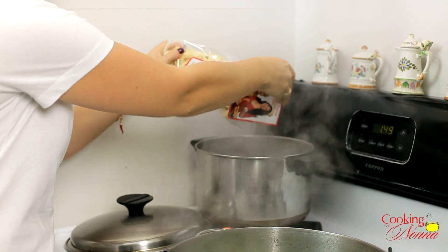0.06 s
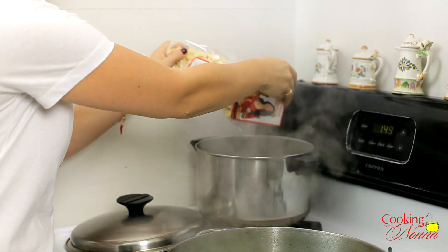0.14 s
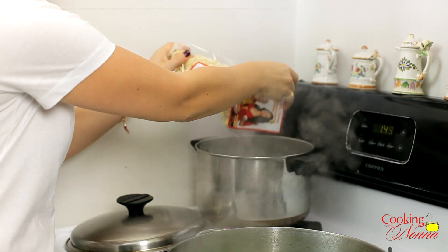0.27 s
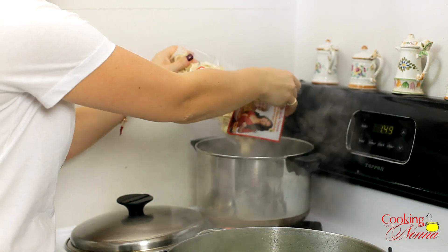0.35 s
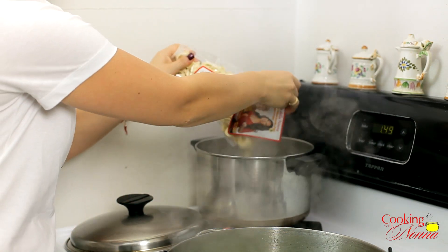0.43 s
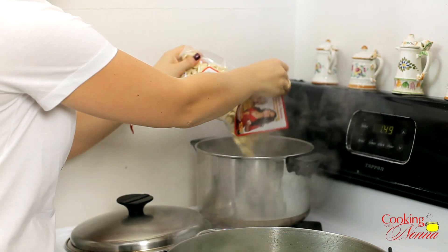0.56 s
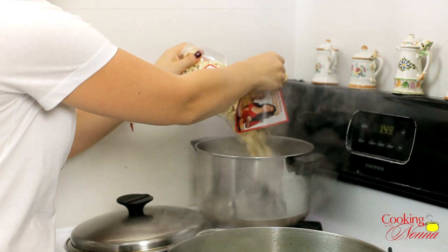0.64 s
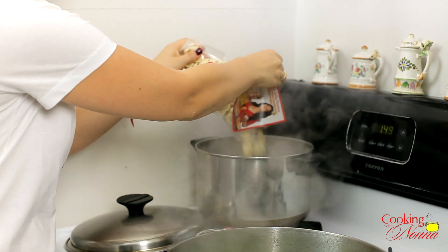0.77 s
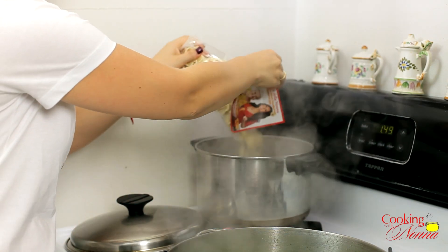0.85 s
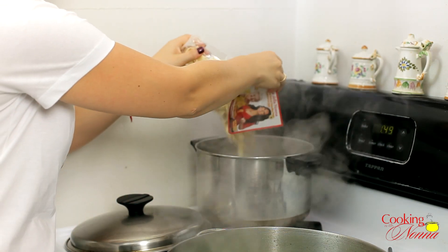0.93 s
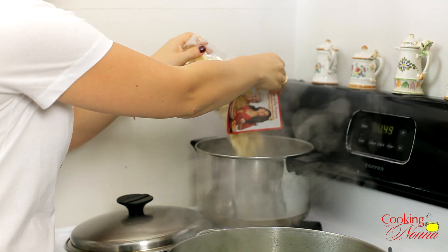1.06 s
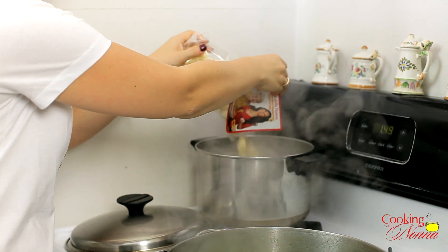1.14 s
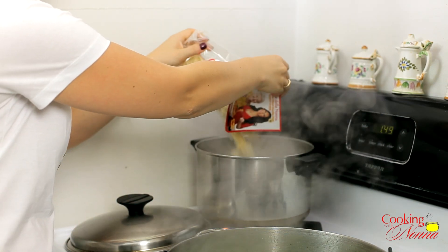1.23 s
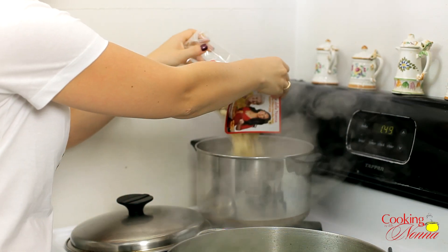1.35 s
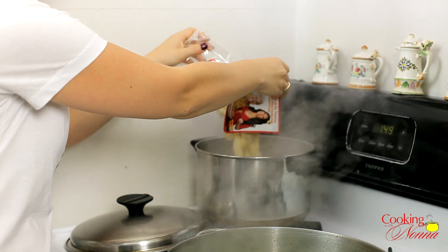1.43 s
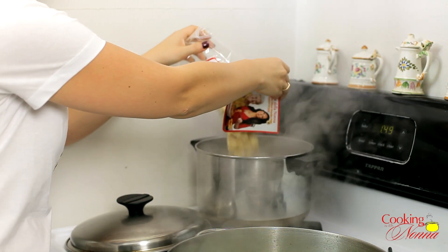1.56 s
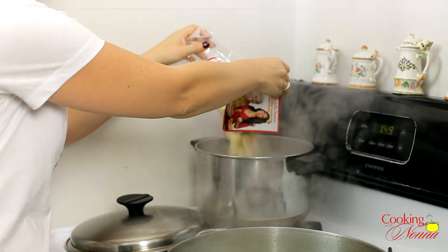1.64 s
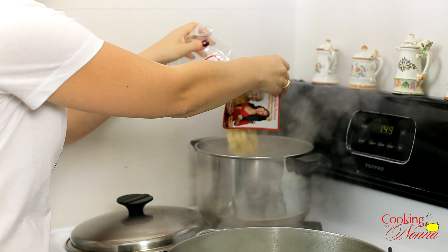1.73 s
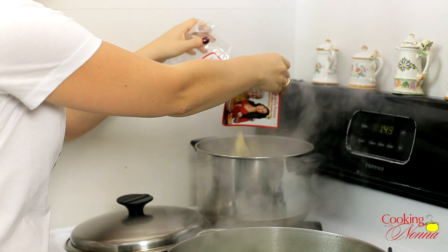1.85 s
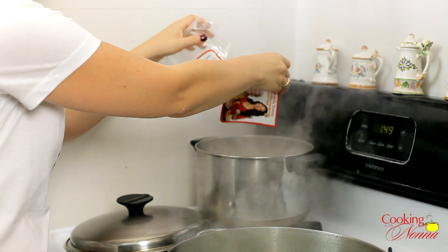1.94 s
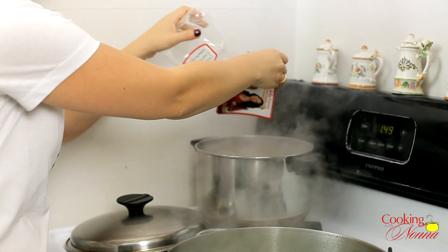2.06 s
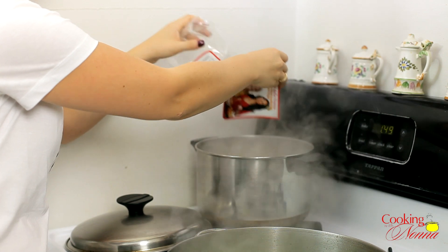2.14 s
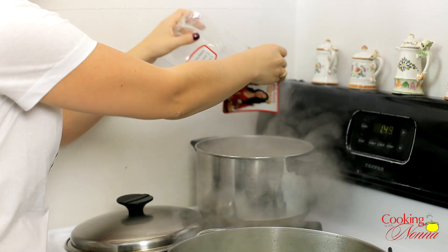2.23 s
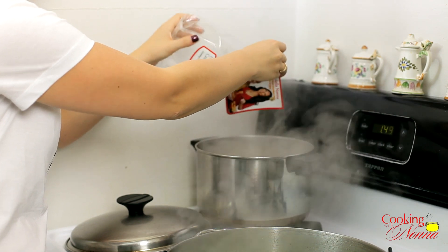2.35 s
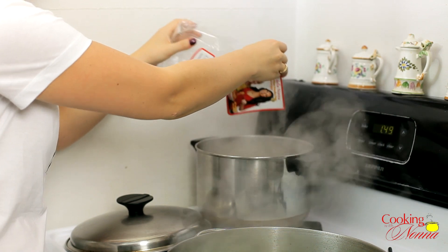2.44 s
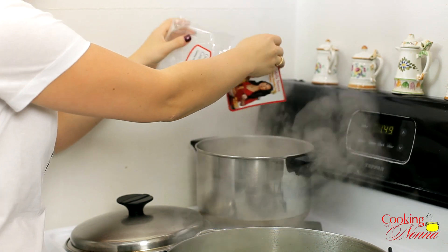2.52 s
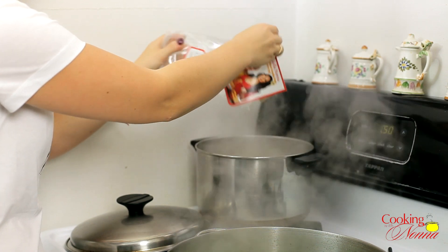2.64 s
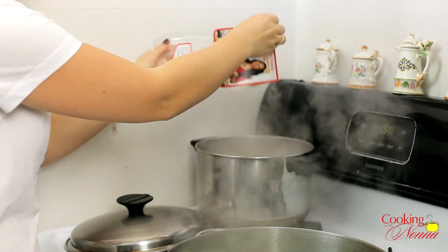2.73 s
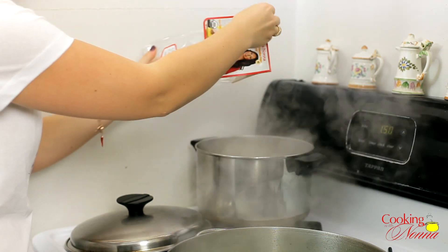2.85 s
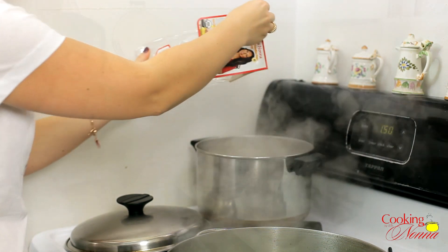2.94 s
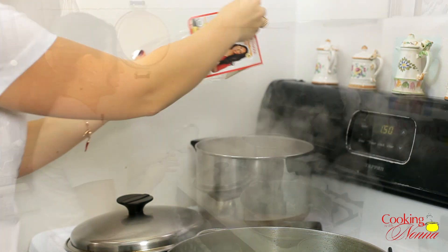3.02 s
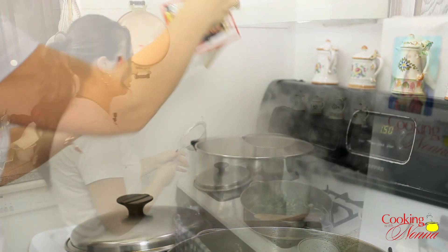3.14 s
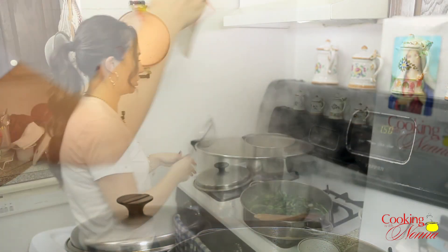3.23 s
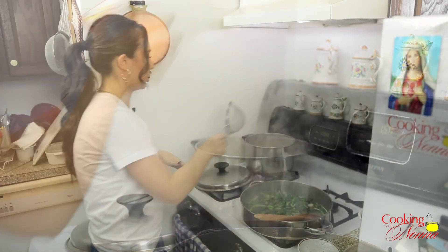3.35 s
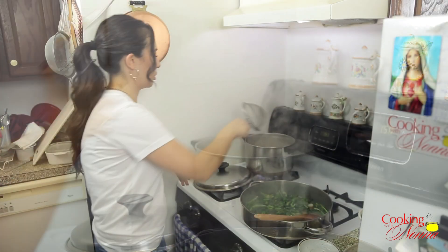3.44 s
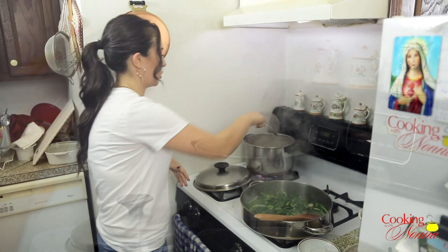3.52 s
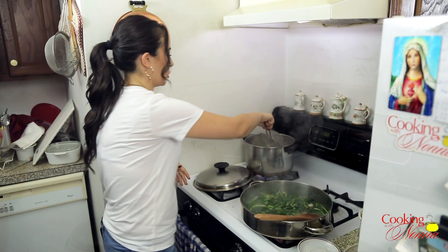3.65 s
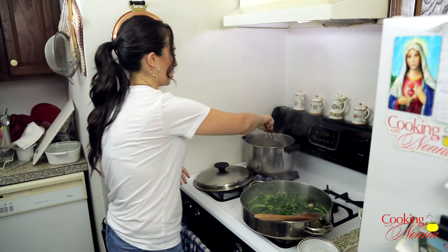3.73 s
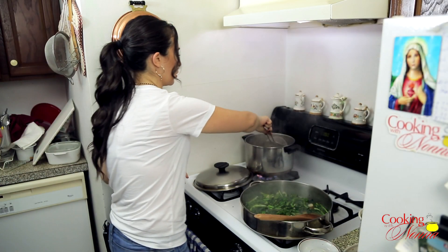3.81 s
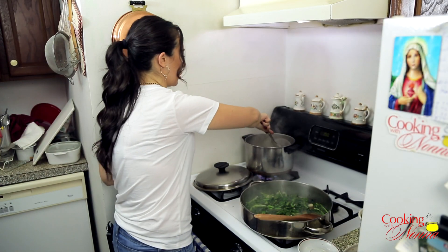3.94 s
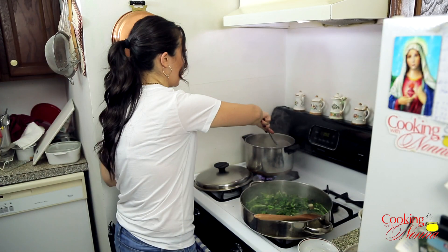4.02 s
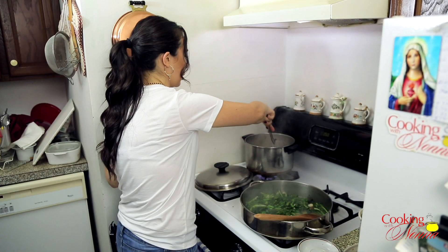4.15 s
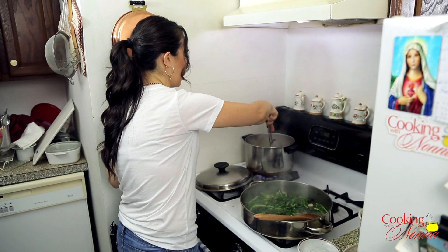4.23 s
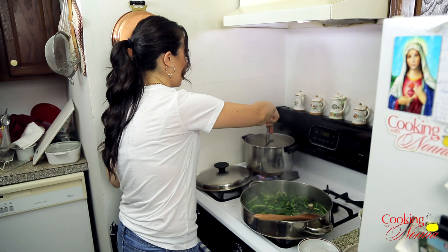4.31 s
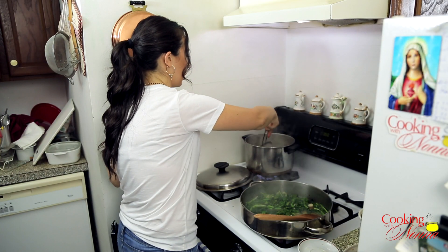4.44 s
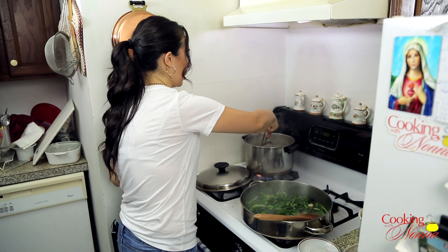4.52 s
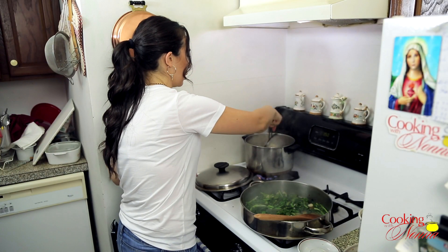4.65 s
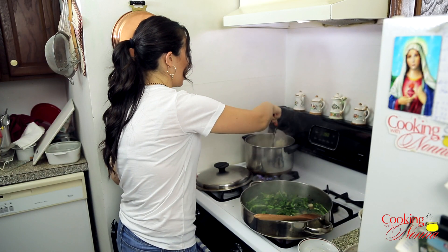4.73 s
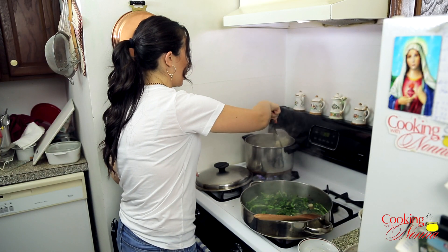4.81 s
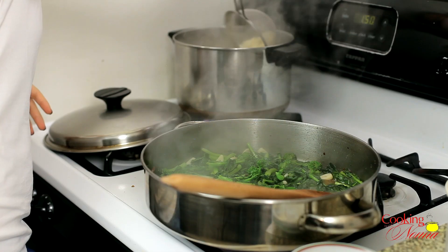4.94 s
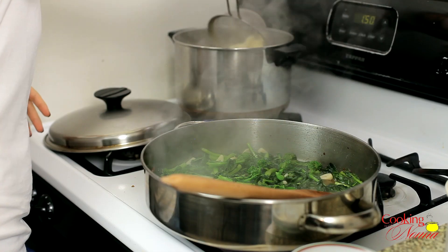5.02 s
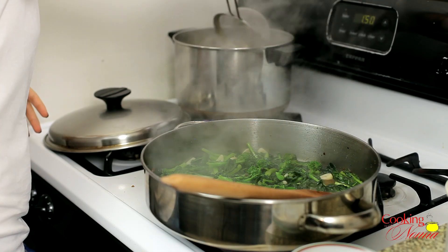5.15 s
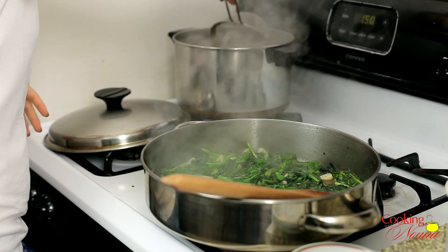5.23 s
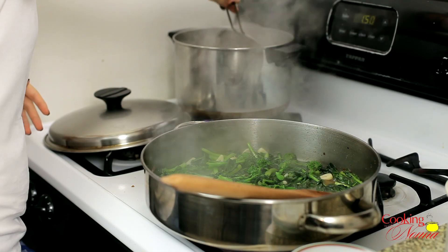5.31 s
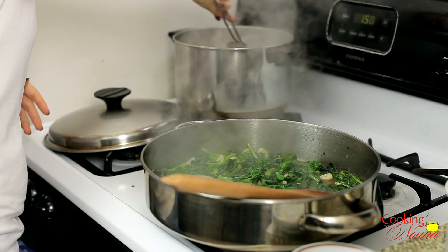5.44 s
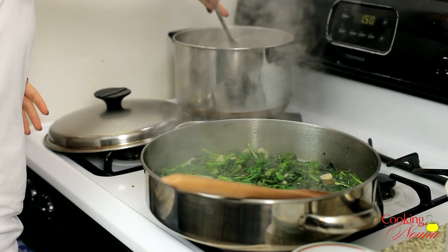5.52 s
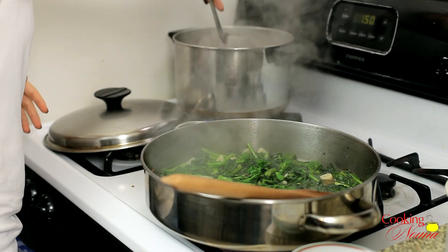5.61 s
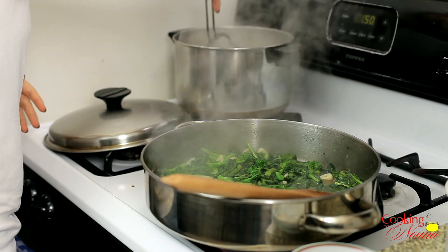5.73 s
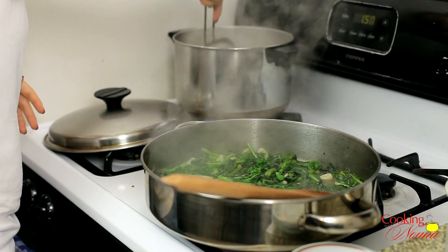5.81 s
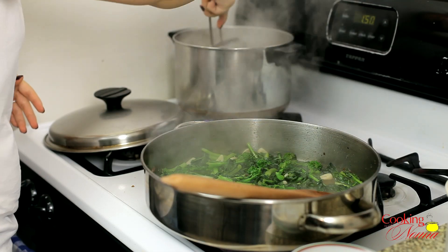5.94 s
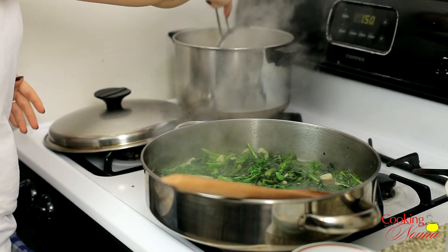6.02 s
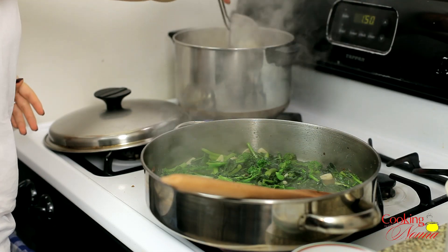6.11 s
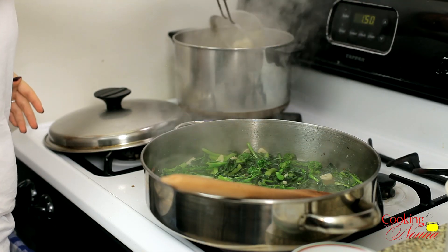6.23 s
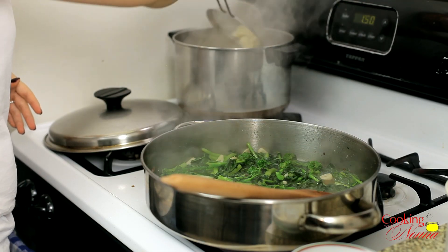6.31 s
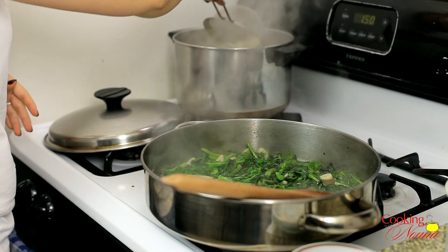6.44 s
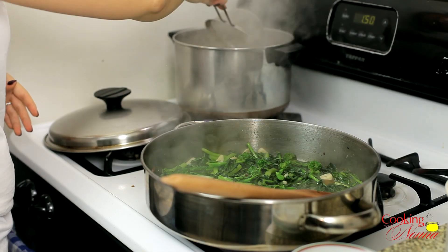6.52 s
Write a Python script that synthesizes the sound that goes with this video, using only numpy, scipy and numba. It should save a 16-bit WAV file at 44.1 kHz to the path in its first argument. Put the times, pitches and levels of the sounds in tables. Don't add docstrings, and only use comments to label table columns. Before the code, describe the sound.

Crisp plastic crackling swells into a clattering pour of hard pasta with watery plops, then bag crushing and faint steel scrapes over kitchen hum.

```python
import sys
import numpy as np
from scipy import signal
from scipy.fft import rfft, irfft
from scipy.io import wavfile
from scipy.ndimage import uniform_filter1d
from numba import njit

SR = 44100
rng = np.random.default_rng(int(sys.argv[2]) if len(sys.argv) > 2 else 0)


def level_to_linear(level):
    exponent = np.asarray(level, float) / 20
    return 10 ** exponent


def master(y):
    cut = np.clip(np.atleast_2d(y).T, -1, 1)
    pcm = np.round(cut * 32767)
    wavfile.write(sys.argv[1], SR, pcm.astype(np.int16))


N = 289737

# pitch_hz, level_db [dB per Hz]
KITCHEN_AIR = [(41, -33), (70, -47), (108, -15), (145, -0.5), (208, 2), (307, 3.5), (344, 10), (441, -5.5),
               (566, 3.5), (700, -34), (955, -45), (6900, -20.5), (9490, -14), (16000, -20.5)]
# pitch_hz, level_db
HUM = [(120, -71.5), (205, -69.5), (240, -72.5), (360, -87), (15250, -123)]
# start_s, level_db
SWAY = [
    (0.0, -56),
    (0.27, -65),
    (0.45, -59),
    (1.6, -60),
    (1.88, -59),
    (2.05, -66.5),
    (3.4, -63.5),
    (4.1, -63.5),
    (5.1, -70),
    (6.57, -75),
]
# start_s, crack_db, body_db, crumple_t60_s
SHAKES = [(0.0024, -23.5, -31.5, 0.029), (0.0508, -34, -57, 0.026), (0.063, -31, -50, 0.02),
          (0.0697, -25.5, -30.5, 0.039), (0.0872, -18, -27.5, 0.027), (0.1228, -37, -46, 0.032),
          (0.1391, -17, -29.5, 0.033), (0.2608, -44, -31.5, 0.024), (0.2738, -31, -34, 0.21),
          (0.2992, -25, -26.5, 0.052), (0.362, -38, -37, 0.024), (0.3735, -32, -36, 0.018),
          (0.409, -35, -34.5, 0.034), (0.4529, -29, -36.5, 0.012), (0.4838, -18, -32.5, 0.033),
          (0.5182, -21, -39, 0.028), (0.5651, -26, -44, 0.02), (0.604, -19, -34, 0.047),
          (0.634, -19, -25.5, 0.11), (0.6739, -12, -29, 0.032), (0.682, -19.5, -31, 0.066),
          (0.7203, -21, -60, 0.033), (0.7677, -17.5, -26.5, 0.01), (0.8026, -16.5, -29, 0.16),
          (0.86, -21.5, -41, 0.089), (0.8875, -19, -42, 0.088), (0.9208, -18.5, -46, 0.02),
          (0.9946, -18.5, -50, 0.07), (1.045, -24, -38, 0.018), (1.0804, -14, -32, 0.032),
          (1.1163, -22, -58, 0.025)]
# start_s, crack_db, body_db, rattle_t60_s
CLUMPS = [(1.1595, -13.5, -38, 0.13), (1.2324, -9, -29, 0.04), (1.255, -12.5, -26, 0.037),
          (1.287, -10, -36, 0.044), (1.317, -11.5, -23, 0.033), (1.3701, -16.5, -26.5, 0.072),
          (1.4436, -13.5, -24, 0.061), (1.482, -9, -17, 0.0086), (1.503, -13.5, -25.5, 0.17),
          (1.5472, -20.5, -31, 0.44), (1.5891, -12.5, -26.5, 0.039), (1.603, -19, -32, 0.044),
          (1.657, -9, -24, 0.021), (1.668, -10.5, -35, 0.025), (1.705, -26, -32, 0.039),
          (1.7344, -12, -32, 0.091), (1.7892, -20, -25.5, 0.058), (1.826, -17, -32, 0.046),
          (1.89, -12, -37, 0.014), (1.9135, -13, -33, 0.03), (1.936, -13, -34, 0.04),
          (1.966, -5.5, -27, 0.02), (2.0004, -8.5, -56, 0.033), (2.02, -14, -34, 0.017),
          (2.0541, -16.5, -36.5, 0.053)]
# start_s, crack_db, body_db, t60_s
SETTLES = [
    (2.143, -34, -49, 0.019),
    (2.152, -60, -43, 0.046),
    (2.1969, -38, -62, 0.013),
    (2.221, -60, -49, 0.02),
    (2.2465, -60, -44, 0.019),
    (2.2598, -46, -70, 0.033),
    (2.3062, -43, -73, 0.023),
    (2.3336, -48, -72, 0.025),
    (2.3521, -39.5, -65, 0.02),
]
# start_s, crack_db, body_db, crumple_t60_s
CRUMPLES = [(2.4891, -32.5, -35, 0.036), (2.4971, -39, -32.5, 0.0085), (2.5797, -43, -49, 0.035),
            (2.612, -25, -34.5, 0.027), (2.7402, -51, -52, 0.053), (2.763, -47, -52.5, 0.32),
            (2.7876, -46, -51, 0.38), (2.8177, -51, -38.5, 0.24), (2.836, -28, -47, 0.018),
            (2.8515, -17, -40, 0.0061), (2.8561, -25.5, -31, 0.046), (2.886, -34, -44, 0.028),
            (2.8982, -48, -32.5, 0.045), (2.9082, -25, -34, 0.008), (2.92, -18.5, -22.5, 0.029),
            (2.9464, -27.5, -31.5, 0.032), (2.9644, -32, -39, 0.018), (2.9906, -44, -57, 0.016),
            (3.006, -47, -37, 0.006), (3.0653, -63, -51.5, 0.16), (3.0975, -35, -42, 0.012),
            (3.1012, -16.5, -25.5, 0.0064), (3.2048, -53, -51.5, 0.021), (3.264, -44, -54, 0.021)]
# start_s, crack_db, body_db, t60_s
SLAPS = [
    (2.5685, -58, -70, 0.006),
    (2.616, -56, -44, 0.007),
    (3.1045, -67, -30.5, 0.02),
]
# pitch_hz, level_db [dB per Hz]
FILM = [(1760, -34), (3000, -36), (3450, 0.5), (5070, 6), (10100, 12), (15100, 0), (16000, -19)]
# start_s, level_db
PUFFS = [(0.0024, -36), (0.0908, -37), (0.1385, -27.5), (0.3004, -55), (0.485, -25.5), (0.519, -30.5),
         (0.602, -33), (0.633, -39), (0.676, -29), (0.921, -36), (1.2324, -32), (1.256, -35), (1.317, -31),
         (1.3697, -29), (1.4817, -34), (1.504, -31), (1.8898, -34), (2, -37), (2.615, -41), (2.8402, -38),
         (2.8518, -30.5), (2.922, -28), (2.946, -41), (3.101, -35.5), (3.9123, -42), (4.619, -63),
         (5.489, -54), (5.548, -50), (6.25, -54)]
# start_s, level_db, pitch_hz, cycles, glide [octaves a second]
STOVE_BUMP = [
    (3.355, -47, 92.5, 18, -28.5),
]
# start_s, peak_db, pitch_hz
PIECES = [(0.001, -36, 10000), (0.002, -54, 4260), (0.029, -51, 8900), (0.087, -46, 8957),
          (0.088, -39, 6029), (0.091, -36, 11714), (0.142, -28, 10800), (0.217, -58, 4478),
          (0.274, -50, 12575), (0.33, -42, 9474), (0.364, -54, 11541), (0.387, -58, 12575),
          (0.41, -54, 6201), (0.452, -47, 4478), (0.484, -40, 12575), (0.486, -34, 10400),
          (0.518, -42, 5684), (0.518, -36, 7751), (0.519, -30, 11197), (0.564, -47, 13953),
          (0.566, -45, 4600), (0.603, -32, 4700), (0.637, -33, 9000), (0.667, -33, 4620),
          (0.767, -42, 12403), (0.809, -40, 8957), (0.825, -40, 13436), (0.86, -39, 9646),
          (0.888, -42, 8200), (0.921, -40, 7400), (0.921, -33, 12230), (0.95, -44, 7751),
          (0.967, -39, 4995), (1.046, -44, 4306), (1.081, -36, 8268), (1.116, -40, 9302),
          (1.139, -42, 8957), (1.159, -30, 9700), (1.185, -29, 6140), (1.256, -27, 10508),
          (1.317, -25, 9350), (1.371, -41, 6029), (1.371, -25, 9300), (1.448, -28, 8000),
          (1.483, -24, 10400), (1.578, -27, 10100), (1.706, -31, 6201), (1.734, -24, 9400),
          (1.892, -35, 13953), (1.892, -28, 8540), (1.924, -33, 10163), (1.943, -25, 9819),
          (1.969, -36, 13608), (1.998, -35, 3300), (2.027, -34, 9819)]
# start_s, peak_db, pitch_hz
DROPS = [(0.075, -49, 1120), (0.136, -31, 717), (0.293, -46, 1070), (0.363, -42, 1004), (0.363, -35, 570),
         (0.633, -58, 1010), (0.633, -39, 574), (0.685, -29, 553), (0.798, -42, 620), (0.85, -36, 1250),
         (0.955, -50, 600), (1.016, -37, 916), (1.042, -47, 580), (1.077, -33, 606), (1.155, -58, 640),
         (1.181, -42, 1300), (1.19, -42, 610), (1.234, -31, 593), (1.399, -37, 630), (1.408, -29, 1315),
         (1.425, -28, 1060), (1.503, -27, 533), (1.573, -30, 1062), (1.599, -30, 574), (1.678, -27, 607),
         (1.791, -39, 615), (1.826, -18, 976), (1.913, -41, 1210), (1.939, -37, 574), (2.052, -35, 631)]
# start_s, peak_db, pitch_hz
SNAPS = [(0.2185, -51, 4000), (0.248, -44, 4000), (0.435, -43, 5000), (0.499, -37, 7000),
         (0.599, -20, 6060), (2.498, -41.5, 250), (2.501, -30, 1030), (2.502, -37, 2300),
         (2.553, -45, 1030), (2.582, -40, 1100), (2.612, -40, 291), (2.615, -31, 3530), (2.789, -37, 4800),
         (2.8175, -32, 11200), (2.836, -39, 6940), (2.8405, -21, 10600), (2.852, -28, 10100),
         (2.887, -38, 10500), (2.9005, -35, 10500), (2.909, -29, 990), (2.9215, -14.5, 9700),
         (2.9275, -31, 10500), (2.947, -30, 11000), (2.964, -35, 4300), (2.99, -39, 3360),
         (3.006, -28, 9870)]
# start_s, peak_db, pitch_hz
PINGS = [(4.693, -79, 5971), (4.897, -71, 9532), (5.008, -68, 9991), (5.037, -72, 4708), (5.052, -62, 9646),
         (5.054, -65, 12632), (5.095, -57, 9761), (5.13, -67, 3675), (5.172, -71, 7694), (5.219, -65, 6890),
         (5.219, -65, 12288), (5.219, -58, 9900), (5.222, -67, 5742), (5.263, -68, 9800),
         (5.489, -67, 6600), (5.589, -69, 7600), (5.679, -62, 9400), (5.69, -61, 7300), (5.716, -66, 7005),
         (5.888, -72, 13896), (5.896, -62, 11000), (6.199, -67, 9302), (6.354, -73, 12862),
         (6.354, -67, 7005), (6.356, -63, 10106), (6.412, -70, 13436), (6.412, -67, 3675),
         (6.412, -57, 10221), (6.469, -60, 4249), (6.484, -69, 12173)]
# start_s, flow_db
FLOW = [
    (0.0, -63),
    (0.4, -58.5),
    (0.58, -50),
    (0.72, -43),
    (1.08, -44.5),
    (1.18, -36),
    (1.5, -32),
    (1.95, -29),
    (2.037, -35),
]
# pitch_hz, level_db [dB per Hz]
CLATTER = [(2470, -30), (4200, 0), (6250, 8.5), (9780, 12), (14900, -7.5), (16000, -31)]
# pitch_hz, width_hz, level_db
POT_AIR = [(335, 110, -7), (562, 36, -1), (604, 40, 2), (730, 80, -8), (1086, 450, 0.5), (1200, 880, -23.5)]
# pitch_hz, width_hz, level_db
POT_WALL = [(1570, 270, -34), (2198, 39, -3), (2504, 110, -1.5), (3246, 83, -5.5), (3700, 1900, 2)]
# start_s, peak_db, pitch_hz, cycles
CLINKS = [(0.802, -17.5, 3030, 32), (0.966, -21.5, 4900, 71), (2.617, -18.5, 1820, 5.4),
          (2.616, -25, 2300, 16), (3.1055, -39, 1110, 5.9), (3.8927, -33.5, 2050, 28),
          (3.9804, -45, 1900, 43), (4.019, -44, 1230, 71), (4.052, -45, 1230, 99), (4.22, -49, 1980, 49),
          (4.4059, -53, 3560, 44), (4.291, -50, 1254, 45), (4.389, -46, 1196, 48), (4.457, -44, 1196, 44),
          (5.0823, -57, 3590, 40), (5.1312, -46, 3700, 32), (5.492, -42, 1810, 23), (5.51, -47, 1960, 73),
          (5.55, -53, 1230, 70), (5.792, -42.5, 960, 33), (5.883, -52.5, 2470, 140),
          (6.4627, -45, 3940, 33), (6.468, -44, 4200, 30), (6.499, -38, 2430, 20), (6.5206, -41, 2500, 22)]
# start_s, peak_db, pitch_hz, cycles
GULPS = [(3.203, -40, 485, 11), (3.742, -39, 530, 11), (3.899, -26.5, 643, 12), (4.523, -42.5, 518, 49),
         (4.561, -40, 550, 9.7), (5.135, -44, 605, 18), (5.204, -38, 590, 8.1), (5.639, -42, 290, 23),
         (5.725, -37, 640, 6.8), (5.879, -39.5, 530, 23), (5.8, -44, 276, 19), (5.907, -38, 321, 19),
         (5.91, -38.5, 522, 45), (6.462, -41, 590, 17)]
# start_s, tick_db, body_db, rattle_t60_s
KNOCKS = [(3.6511, -52, -79, 0.048), (3.8779, -27.5, -54, 0.027), (3.8914, -26, -39.5, 0.016),
          (3.9139, -18.5, -34.5, 0.053), (5.104, -42, -55, 0.03), (5.1304, -40, -51, 0.017),
          (5.203, -60, -47.5, 0.033), (5.4898, -35, -42.5, 0.032), (5.8994, -41, -77, 0.015),
          (6.3525, -42, -83, 0.027), (6.4138, -42, -58, 0.019), (6.4639, -41.5, -47, 0.08),
          (6.5066, -42, -73, 0.021)]
# start_s, tick_db, body_db, t60_s
TICKS = [
    (5.0525, -43.5, -66, 0.025),
    (5.0953, -45, -61, 0.033),
    (5.2195, -40.5, -68, 0.026),
]
# pitch_hz, width_hz, level_db
TONGS = [(1230, 100, 0.5), (2130, 860, 2), (3800, 1300, -0.5), (4100, 1600, -5), (6800, 1450, 1),
         (9500, 8500, 1)]
# start_s, length_s, water_start_db, water_end_db, singing_db
STROKES = [
    (3.55, 0.26, -70, -66, -85),
    (3.918, 0.016, -50, -51, -57),
    (3.936, 0.79, -64, -68.5, -71),
    (4.268, 0.15, -66.5, -57.5, -69.5),
    (4.45, 0.11, -68.5, -57.5, -69.5),
    (5.078, 0.15, -65.5, -62.5, -77.5),
    (5.513, 0.266, -61.5, -58.5, -71.5),
    (5.74, 0.17, -70, -57.5, -74.5),
    (6.458, 0.079, -63, -63, -78),
]
# pitch_hz, width_hz, level_db
SINGING = [(4760, 1100, -10), (6870, 700, 0.5), (10100, 2800, -3)]


def unit(x):
    return x / np.sqrt(np.mean(x ** 2))


def samples(start_s):
    return (start_s * SR).astype(np.int64)


def colour(x, points):
    hz, db = np.transpose(points)
    grid = np.maximum(np.arange(4097) * SR / 8192, 1)
    cepstrum = irfft(np.log(level_to_linear(np.interp(np.log(grid), np.log(hz), db))))
    cepstrum[1:4096] *= 2
    cepstrum[4097:] = 0
    h = irfft(np.exp(rfft(cepstrum)))[:4096]
    return signal.fftconvolve(x, h / np.sqrt(np.sum(h ** 2)))[:len(x)]


def ring(x, modes, dips=False):
    sign = 1 if dips else -1
    out, energy = 0, 0
    for k, (hz, width, db) in enumerate(modes):
        gain = level_to_linear(db) / np.sqrt(width)
        out = out + sign ** k * gain * signal.lfilter(*signal.iirpeak(hz, hz / width, SR), x)
        energy += gain ** 2 * np.pi * width / SR
    return out / np.sqrt(energy)


def muffle(x):
    return signal.sosfilt(signal.butter(3, 1400, fs=SR, output="sos"), x)


def walk(rate):
    k = int(SR / rate)
    return 0.4 * uniform_filter1d(np.repeat(rng.standard_normal(N // k + 1), k), k)[:N]


def clicks(rate, spread_db):
    hit = rng.random(N) < rate / SR
    size = level_to_linear(spread_db * np.minimum(rng.exponential(size=N), 3.2))
    return unit(hit * rng.standard_normal(N) * size)


@njit
def grains(start, hz, cycles, size, glide):
    out = np.zeros(N)
    for k in range(len(start)):
        w = 2 * np.pi * hz[k] / SR
        z, p = size[k] + 0j, np.exp(1j * w - w / cycles[k])
        turn = np.exp(1j * w * np.log(2) * glide[k] / SR)
        for i in range(start[k], min(N, start[k] + int(6 * cycles[k] / w))):
            out[i] += z.imag
            z, p = z * p, p * turn
    return out


def shower(rate, centre_hz, octaves, cycles, spread_db, glide=0.):
    count = int(rate * N / SR)
    hz = np.clip(centre_hz * 2 ** (octaves * rng.standard_normal(count)), 50, .4 * SR)
    size = level_to_linear(spread_db * np.minimum(rng.exponential(size=count), 4))
    start = rng.integers(0, N, count)
    return unit(grains(start, hz, np.full(count, 1. * cycles), size, np.full(count, 1. * glide)))


def kitchen():
    t = np.arange(N) / SR
    air = colour(rng.standard_normal(N), KITCHEN_AIR) * level_to_linear(-65 + 0.75 * walk(18))
    fizz = level_to_linear(-77.5 + 6.1 * walk(11)) * shower(900, 9900, 0.2, 60, 4.0)
    hum = sum(level_to_linear(db + 2 + 1.0 * walk(6.5)) * np.sin(2 * np.pi * hz * t) for hz, db in HUM)
    rumble = colour(rng.standard_normal(N), [(8, -22), (27, 3.5), (60, -8.5), (150, -12.5), (500, -67)])
    sway = level_to_linear(np.interp(t, *np.transpose(SWAY)))
    return air + fizz + hum + sway * level_to_linear(2.0 * walk(4.4)) * rumble


def hits(tables, bright, mid, body, mid_share):
    lanes, t = np.zeros((3, N + SR)), np.arange(SR // 4) / SR
    crackle = np.pad([clicks(3500, 5.0) for _ in range(3)], ((0, 0), (0, SR)), "wrap")
    for rows, mid_db, tick in tables:
        for s, snap_db, body_db, t60, *_ in rows:
            i = int(s * SR)
            fade = 1000. ** (-t / np.clip(t60, .005, .4))
            burst = fade * crackle[:, i:i + len(t)]
            burst *= np.linalg.norm(fade) / np.linalg.norm(burst, axis=1)[:, None]
            burst[:, 0] -= tick
            between_db = snap_db + mid_db + mid_share * (body_db - snap_db)
            levels_db = np.array([[snap_db - 14.5], [between_db], [body_db - 7]])
            lanes[:, i:i + len(t)] += level_to_linear(levels_db) * burst
    treble, middle, low = lanes[:, :N]
    return bright(treble) + ring(middle, mid) + ring(low, body, dips=True)


def plastic_bag():
    tables = [(SHAKES, -13, 6.6), (CLUMPS, -13, 3.0), (CRUMPLES, -15, 8.0), (SLAPS, 12, 4.0),
              (SETTLES, -26, 6.0)]
    middle = [(2050, 20000, -0.5), (3400, 4200, 1.5)]
    body = [(307, 140, -5.5), (592, 90, -4.5), (933, 400, 2.0)]
    return hits(tables, lambda x: colour(x, FILM), middle, body, mid_share=0.13)


def puffs():
    kicks, (s, db) = np.zeros(N), np.transpose(PUFFS)
    kicks[samples(s)] = -level_to_linear(db + 43.5)
    push = signal.lfilter(*signal.butter(1, 60, fs=SR), kicks)
    s, db, hz, cycles, glide = np.transpose(STOVE_BUMP)
    bump = -grains(samples(s), hz, cycles, level_to_linear(db), glide)
    bass_cut = signal.cheby1(4, 3.0, 24, "highpass", fs=SR, output="sos")
    return bump + signal.sosfilt(bass_cut, push)


def singles():
    out = 0
    for table, ring_s, db in ((PIECES, 0.0009, 12), (DROPS, 0.0091, -1.5), (PINGS, 0.0015, 11),
                              (SNAPS, None, -0.5)):
        s, peak_db, hz = np.transpose(table)
        cycles = 2 * np.pi * hz * ring_s if ring_s else np.full(len(s), 15.4)
        out = out + grains(samples(s), hz, cycles, level_to_linear(peak_db + db), 0 * s)
    return out


def stream():
    simmer_until_s, first_splash_s, heap_s = 3.3, 0.57, 1.71
    t, (s, db) = np.arange(N) / SR, np.transpose(FLOW)
    flow_db = np.interp(t, s, db)
    stop_db = -604 * np.maximum(t - s[-1], 0)
    damp_db = stop_db - 13 * np.maximum(t - heap_s, 0)
    below_full_db = flow_db + 30
    stray_db = -8 * (t < first_splash_s)
    boiling = t < simmer_until_s
    pot = level_to_linear(-37.5 + damp_db + 0.6 * below_full_db) + boiling * level_to_linear(-69)
    splash = level_to_linear(-39.5 + damp_db + 0.58 * below_full_db + stray_db) + boiling * level_to_linear(-79.5)
    return level_to_linear(flow_db + stop_db), pot, splash


def pasta():
    clatter, pot, splash = stream()
    clump = level_to_linear(2.1 * walk(27.2) + 1.0 * walk(100))
    clacks = 0.65 * colour(clicks(5000, 3.15), CLATTER) + 0.45 * shower(3700, 8300, 0.407, 13, 6.2)
    plops = 0.34 * shower(500, 841, 0.358, 21.2, 0.3, glide=9.8)
    landing = level_to_linear(2.8 * walk(29.46)) * clicks(3000, 1.7)
    air_ring = pot * muffle(ring(landing, POT_AIR, dips=True))
    wall_ring = splash * ring(landing, POT_WALL, dips=True)
    return clump * clatter * clacks + pot * plops, air_ring + wall_ring


def tones():
    s, db, hz, cycles = np.transpose(GULPS + CLINKS)
    glide = np.repeat([1.95, 0.1], [len(GULPS), len(CLINKS)])
    return grains(samples(s), hz, 2 * np.maximum(cycles, 1), level_to_linear(db - 9.0), glide)


def strokes():
    rise_db_per_s, fall_db_per_s, stir_from_s = 496, 350, 3.3
    t = np.arange(N) / SR
    out = level_to_linear(np.array((-70, -77.5, -85)))[:, None] * (t > stir_from_s)
    for s, length, start_db, end_db, sing_db in STROKES:
        along = np.clip((t - s) / length, 0, 1)
        edge_db = -rise_db_per_s * np.maximum(s - t, 0) - fall_db_per_s * np.maximum(t - s - length, 0)
        water_db = start_db + (end_db - start_db) * along
        scrape_db = water_db - 4 - 8 * along
        out = np.maximum(out, level_to_linear(edge_db + np.array([water_db, scrape_db, sing_db + 0 * t])))
    return out


def stirring():
    swirl, scrape, sing = strokes()
    water = 0.48 * shower(550, 547, 0.56, 26, 0.45, glide=4.0) + 1.21 * ring(rng.standard_normal(N), POT_AIR)
    drag = level_to_linear(3.5 * walk(18)) * clicks(4000, 2.6)
    return swirl * muffle(water) + scrape * ring(drag, TONGS[:3]) + sing * ring(drag, SINGING)


def steel_tongs():
    tables = [(KNOCKS, -10, 5.0), (TICKS, -26, 5.0)]
    return hits(tables, lambda x: ring(x, TONGS[3:]), TONGS[1:3], POT_AIR, mid_share=0.55)


def room(x):
    t60_s, low_t60_s, rise_s = 0.14, 0.33, 0.012
    echo_db, tail_db = 4, -7
    step, size = 512, 8192
    t = np.arange(size - 2 * step) / SR
    noise = rng.standard_normal((N // step + 2, len(t)))
    low = signal.lfilter(*signal.butter(1, 1200, fs=SR), noise)
    near = np.exp(-(t / rise_s) ** 2)
    far = np.minimum(t / rise_s, 1) * np.array([1000. ** (-t / low_t60_s), 1000. ** (-t / t60_s)])
    echoes = level_to_linear(echo_db) * noise * near / np.linalg.norm(near)
    echoes += level_to_linear(tail_db) * (low * far[0] + (noise - low) * far[1]) / np.linalg.norm(far[1])
    echoes[:, 0] = 1
    padded, out = np.pad(x, (0, 2 * step)), np.zeros(N + 2 * size)
    for k, echo in enumerate(echoes[:-1]):
        moment = padded[k * step:(k + 1) * step]
        out[k * step:k * step + size] += irfft(rfft(moment, size) * rfft(echo, size))
    return out[:N] / np.sqrt(1 + level_to_linear(echo_db) ** 2 + level_to_linear(tail_db) ** 2)


def scene():
    knocks = plastic_bag() + steel_tongs()
    close, notes = singles(), tones()
    clacks, pot = pasta()
    echoing = room(clacks + 0.42 * pot + 0.87 * knocks + stirring() + 0.69 * notes + 0.37 * close)
    direct = 0.38 * close + 0.41 * notes + 0.67 * pot + 0.15 * knocks + 0.19 * clacks
    return (echoing + direct + puffs() + kitchen())[None]


def low_pass(x):
    return signal.sosfilt(signal.butter(12, 16640, fs=SR, output="sos"), x)


def record(dry):
    ceiling, top_hz = .3, 15900
    rounded = ceiling * np.tanh(dry / ceiling)
    top_cut = signal.ellip(8, .2, 70, top_hz, fs=SR, output="sos")
    return low_pass(signal.sosfilt(top_cut, rounded))


dry = scene()
out = record(dry)
master(out)
```